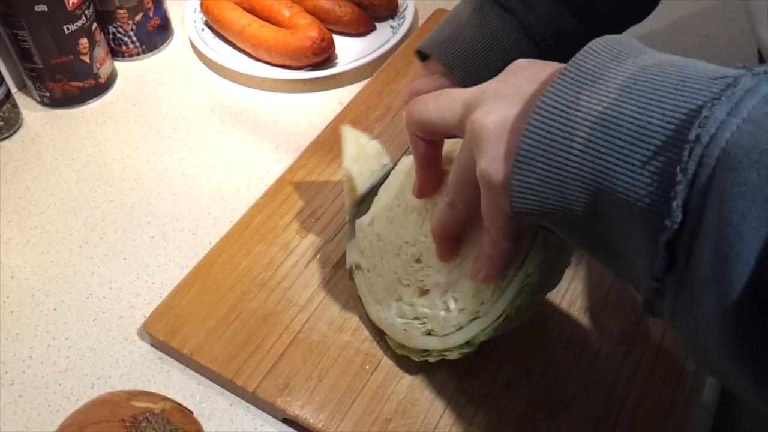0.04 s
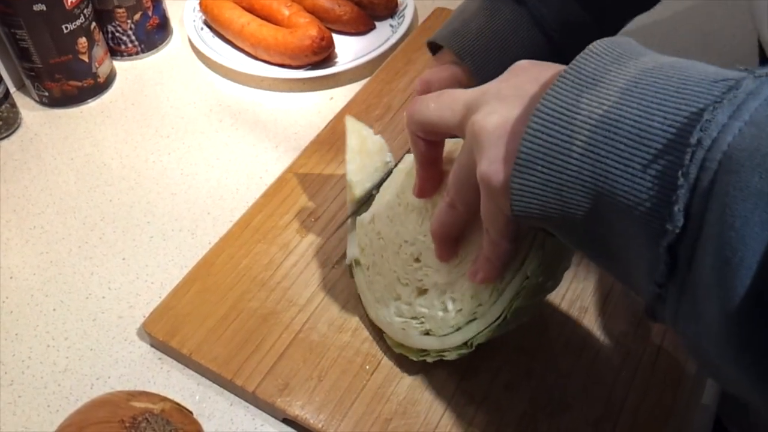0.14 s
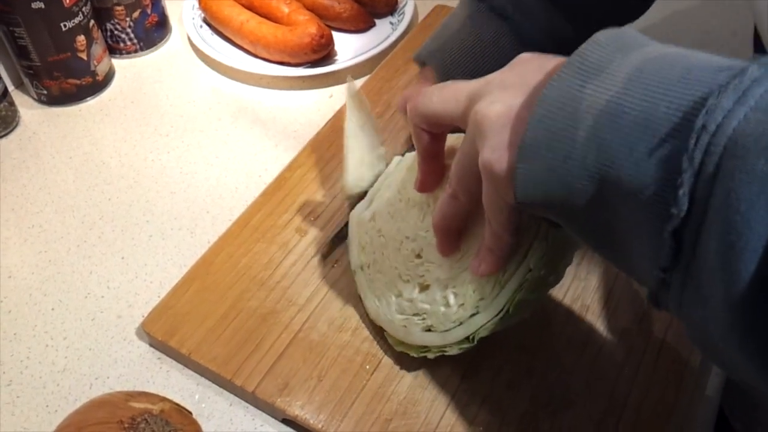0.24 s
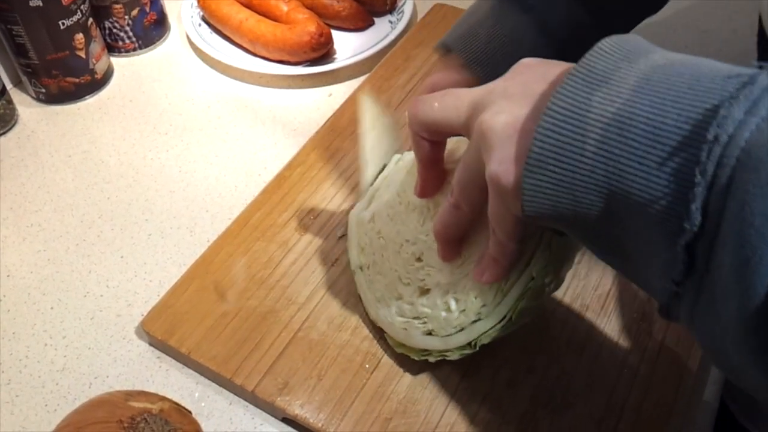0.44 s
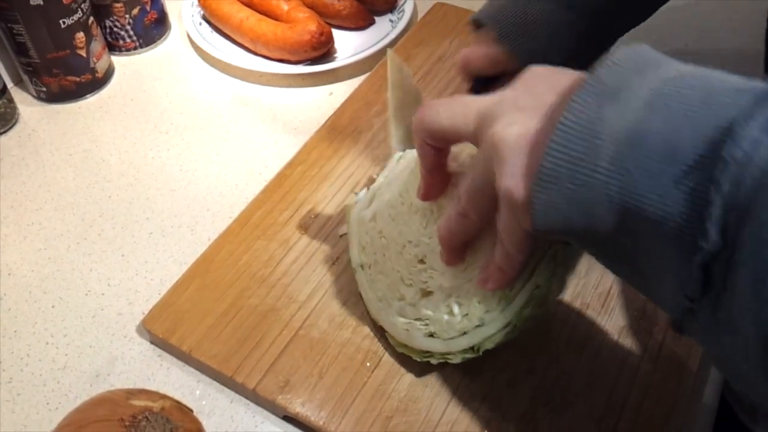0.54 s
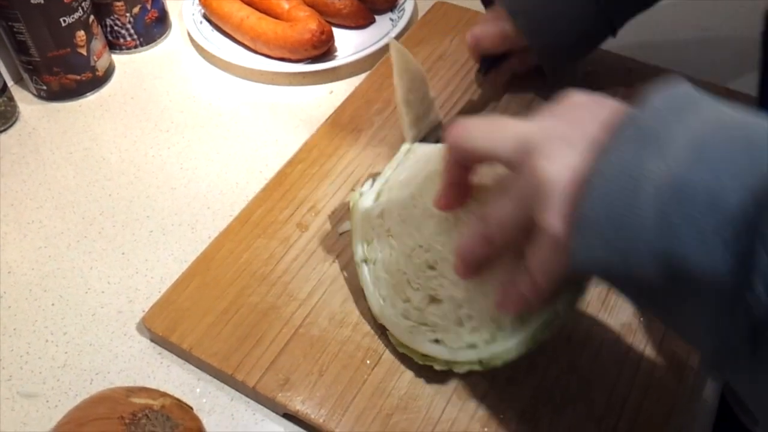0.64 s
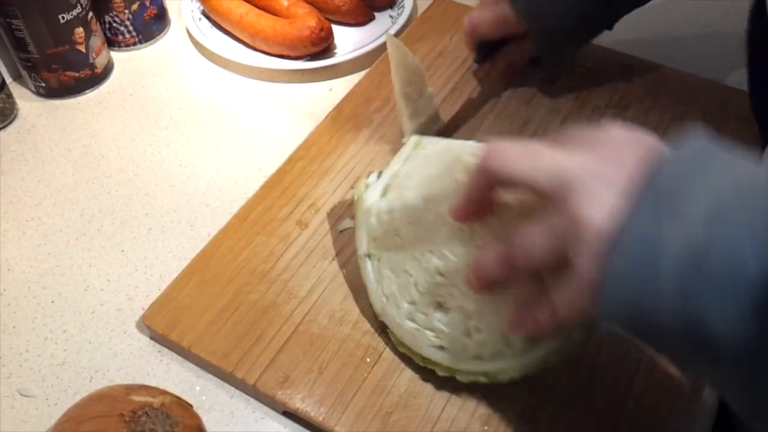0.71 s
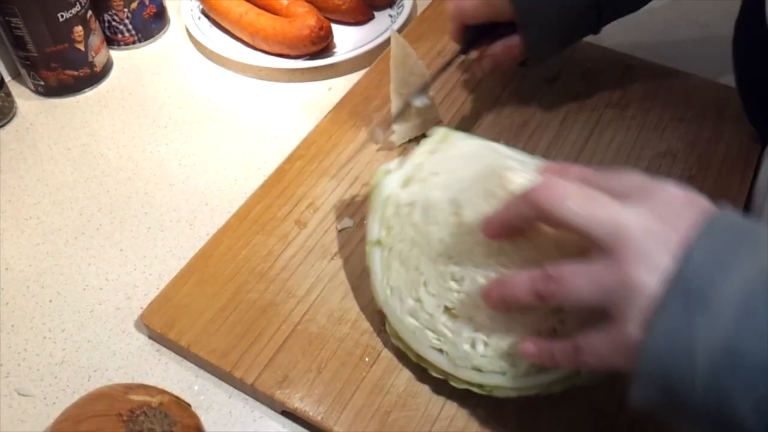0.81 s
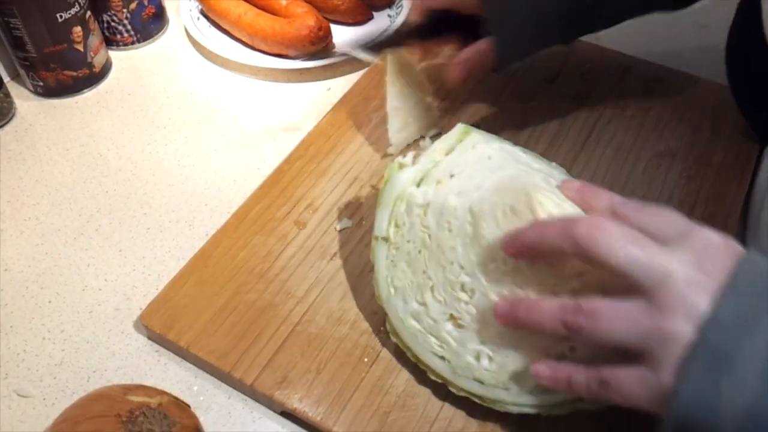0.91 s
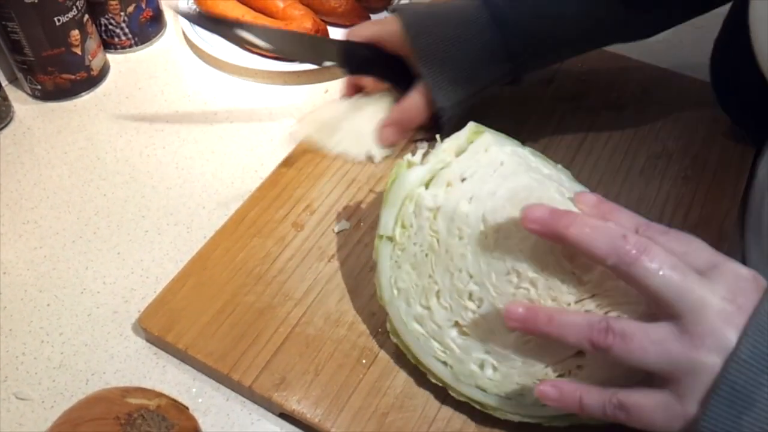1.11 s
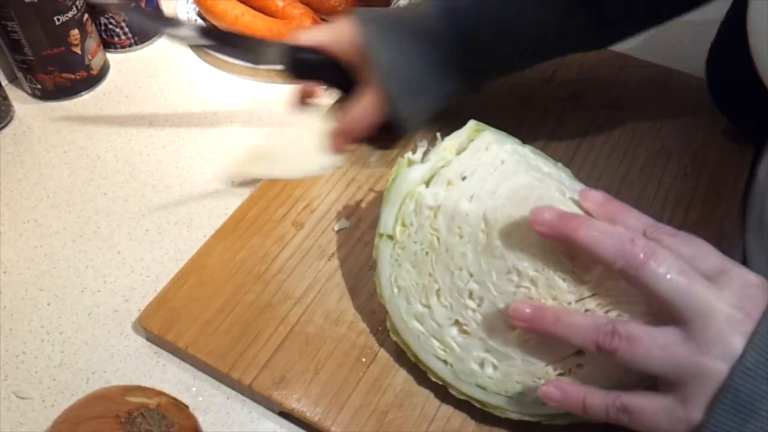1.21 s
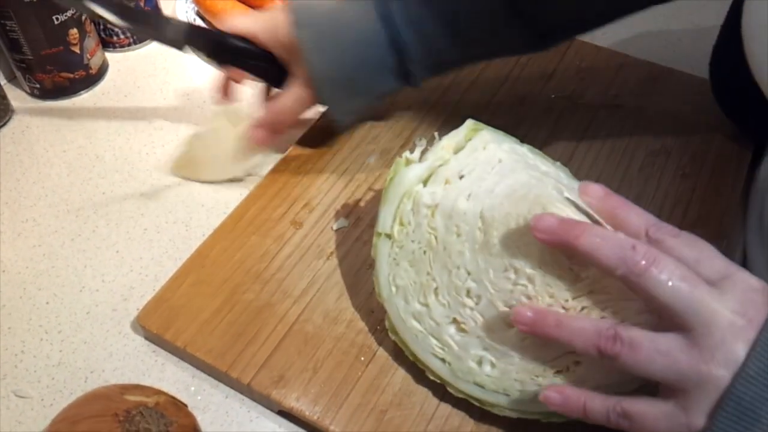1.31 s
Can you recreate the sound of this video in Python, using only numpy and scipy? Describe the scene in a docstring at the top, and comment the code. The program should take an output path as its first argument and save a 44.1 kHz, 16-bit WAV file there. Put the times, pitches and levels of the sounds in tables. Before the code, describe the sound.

A knife pushes through a raw cabbage core with a wet crackle and one sharp snap. Leaves tick and rustle, then the cut piece knocks softly on a wooden board, close by in a faintly humming kitchen.

```python
"""A kitchen knife is forced through a raw cabbage core on a wooden board, in a small, softly humming
kitchen. The blade rubs in the cut with a wet crackle and a leaf or two ticks. At 0.2 s a crack runs
through the core, its cells bursting ever harder, until the wedge snaps off and core, blade and board
ring. The blade slides out past the leaves, which tick and rustle. At 1.1 s the wedge topples onto
the board and rocks in a few soft knocks."""
import sys
import numpy as np
from scipy import signal
from scipy.fft import rfft, irfft, next_fast_len
from scipy.io import wavfile
from scipy.ndimage import uniform_filter1d

SR = 44100
rng = np.random.default_rng(int(sys.argv[2]) if len(sys.argv) > 2 else 0)


def to_wav(s):
    """Save 16-bit WAV."""
    ch = np.atleast_2d(s).T  # columns
    pcm = np.round(np.clip(ch, -1, 1) * 32767)  # PCM
    wavfile.write(sys.argv[1], SR, pcm.astype(np.int16))


N = 59535
T = np.arange(N) / SR
FFT_SIZE = 2 * next_fast_len(N * 3 // 4)
HZ = np.maximum(np.arange(FFT_SIZE // 2 + 1) * SR / FFT_SIZE, 1)


def from_db(db):
    """Decibels to gain."""
    return 10 ** (np.asarray(db) / 20)


def at_hz(points):
    """Draw a curve through (Hz, value) points on a log-frequency axis."""
    hz, value = np.transpose(points)
    return np.interp(np.log(HZ), np.log(hz), value)


def filtered(x, response):
    """Apply a frequency response."""
    return irfft(rfft(x, FFT_SIZE) * response, FFT_SIZE)[..., :N]


def colour(x, points):
    """Minimum-phase EQ through (Hz, dB) points; white noise keeps its power."""
    gain = from_db(at_hz(points))
    cepstrum = irfft(np.log(gain / np.sqrt(np.mean(gain ** 2))))
    cepstrum[1:FFT_SIZE // 2] *= 2
    return filtered(x, np.exp(rfft(cepstrum[:FFT_SIZE // 2], FFT_SIZE)))


def decay(start, t60):
    """Envelope that jumps to 1 and falls 60 dB in t60 seconds."""
    return (T >= start) * from_db(-60 * np.clip((T - start) / t60, 0, 4))


def ring(force, modes):
    """Drive a set of damped resonances; none passes a steady push."""
    body = np.zeros(N)
    for hz, db, t60 in modes:
        omega = 2 * np.pi * hz
        damping = np.log(1000) / (omega * t60)
        body += from_db(db) * decay(0, t60) * (np.cos(omega * T) - damping * np.sin(omega * T))
    body[0] /= 2
    return filtered(force, rfft(body, FFT_SIZE))


def bursting_cells(per_s, spread_db):
    """Random clicks of uneven size, with power held near 1."""
    sizes = from_db(spread_db * np.minimum(rng.exponential(1, N), 5)) * rng.choice([-1, 1], N)
    clicks = sizes * (rng.random(N) < per_s / SR)
    power = np.abs(uniform_filter1d(clicks ** 2, size=500))
    return clicks / np.sqrt(power + 1e-9)


# Stereo width of reflected sound. Each row: frequency in Hz, left-right correlation.
STEREO_LIKENESS = [(50, 0.98), (200, 0.62), (600, 0.52), (1200, -0.13), (2200, -0.002), (6000, 0.14)]

def diffuse_noise():
    """White noise from all around, alike on both sides in the bass only."""
    alike = at_hz(STEREO_LIKENESS)
    mid, side = filtered(rng.standard_normal((2, N)), np.sqrt([(1 + alike) / 2, (1 - alike) / 2]))
    return np.array([mid + side, mid - side])


# The appliance's drone. Each row: pitch in Hz, rms level in dB.
HUM_TONES = [(181, -56), (238, -57.5), (640, -61.5)]

def appliance_hum(width_hz=6.6):
    """An appliance hums throughout; each tone wavers because it is a very narrow band of noise."""
    bands = np.array([1 / (1 + ((HZ - hz) / width_hz) ** 2) for hz, _ in HUM_TONES])
    tones = filtered(rng.standard_normal((len(HUM_TONES), N)), bands)
    return sum(from_db(db) * tone / tone.std() for (_, db), tone in zip(HUM_TONES, tones))


# The dark EQ of the room tone. Each row: frequency in Hz, relative level in dB.
ROOM_TONE_EQ = [(25, 1.5), (55, -14.5), (95, -13), (125, -3), (165, -0.5), (215, -12.5), (290, -6),
                (400, -13), (520, -16), (660, -9.5), (1000, -15), (2000, -24), (5000, -25), (14000, -29.5)]

def room_tone(level_db=-46.5):
    """A faint, steady bed of noise under everything."""
    return from_db(level_db) * colour(diffuse_noise(), ROOM_TONE_EQ)


# The fader ride of the rubbing. Each row: time in seconds, level in dB.
RUB_LEVELS = [(0, -27.5), (.018, -34), (.04, -41.5), (.10, -46.5), (.13, -42.5), (.16, -50.5), (.2, -62.5),
              (.34, -44.5), (.42, -43.5), (.45, -43), (.468, -37.5), (.5, -39.5), (.555, -36.5),
              (.585, -46), (.61, -42.5), (.66, -46.5), (.8, -55), (.93, -54), (1.05, -64), (1.2, -53),
              (1.3, -70)]
# Its broad, crisp EQ. Each row: frequency in Hz, relative level in dB.
RUB_EQ = [(100, -7.5), (300, 0), (800, -2.5), (1500, 0), (2500, 1.5), (3800, 2), (5200, -3), (7500, -0.5),
          (10500, -10.5), (14000, -22)]

def rubbing():
    """Fine crackle of wet leaves against the blade and each other."""
    level = from_db(np.interp(T, *np.transpose(RUB_LEVELS)))
    return colour(bursting_cells(per_s=2000, spread_db=5) * level, RUB_EQ)


# Single leaves cracking. Each row: start in seconds, level in dB, decay time in seconds,
# tilt (treble up, bass down) in dB, leaf pitch in Hz, ring level in dB.
LEAF_TICKS = [(.008, -16.5, 0.0012, -1.5, 3350, 5), (0.069, -10.5, 0.003, 9, 7450, -10),
              (0.206, -2, 0.0012, 10, 7400, -2), (0.22, -1.5, 0.00067, 2.5, 4270, 16),
              (.519, -22, 0.00087, -11.5, 3660, 0), (0.532, -17.5, 0.0023, -1.5, 3270, 13),
              (0.5492, -9.5, 0.0037, -4, 3340, -0.5), (0.571, -16, 0.0028, -3, 2800, 0),
              (0.69, -24, .002, -2, 3400, 4), (.718, -23, 0.0023, -2.5, 3800, 9),
              (0.758, -26.5, 0.0008, -5, 4200, 9), (0.7754, -24.5, 0.0015, -2, 2000, -1),
              (0.809, -20.5, 0.00079, 2, 7200, 1), (0.824, -22, 0.0023, -2, 4100, 7),
              (0.851, -17.5, 0.0051, 1, 8000, 4), (0.855, -16, 0.015, -0.5, 3800, 3),
              (.903, -18.5, 0.0013, -6.5, 3900, 16), (0.909, -19.5, 0.0056, -3.5, 3640, -5),
              (.923, -17.5, 0.0061, -1, 2210, -21), (0.942, -24, 0.0012, -1, 7500, -2),
              (0.9755, -27.5, 0.0022, 2, 3520, 5), (1.030, -27.5, .003, -6.5, 3500, -4),
              (1.1059, -20, 0.0034, -0.5, 2340, 12.5), (1.246, -24.5, 0.0057, 2, 6500, 13)]
# The thin, bright EQ they share. Each row: frequency in Hz, relative level in dB.
TICK_EQ = [(100, -21), (400, -10), (1000, -4.5), (2000, -0.5), (3800, 1), (5200, -1.5), (7500, 1.5),
           (10500, -8.5), (14000, -21)]

def leaf_ticks(leaf_q=8.9, tilt_pivot_hz=4000):
    """Each leaf crack is a short, dying run of bursting cells that rings at the pitch of its leaf."""
    ticks = np.zeros(N)
    for start, db, decay_s, tilt_db, hz, ring_db in LEAF_TICKS:
        fade = (T >= start) * np.exp(-np.minimum(np.abs(T - start) / decay_s, 50))
        run = bursting_cells(per_s=2600, spread_db=4) * fade
        run[int(start * SR)] += 6.2  # the first cell gives a hard attack
        run += from_db(ring_db) * signal.lfilter(*signal.iirpeak(hz, leaf_q, fs=SR), run + 1e-18)
        dull = signal.lfilter(*signal.butter(1, tilt_pivot_hz, fs=SR), run + 1e-18)
        tick = from_db(-tilt_db) * dull + from_db(tilt_db) * (run - dull)
        ticks += from_db(db) * tick / np.linalg.norm(tick)
    return colour(ticks, TICK_EQ)


CRACK_S, SNAP_S = 0.2048, 0.2324
# The biting EQ of the running crack. Each row: frequency in Hz, relative level in dB.
CRACK_EQ = [(50, -21), (110, -5), (300, -8), (900, -5), (1500, -4.5), (2000, 4), (3100, 1), (4300, -1),
            (5200, -2.5), (7200, 5), (10000, -2.5), (14000, -11)]

def core_crack(start_db=-19.5, end_db=-12.5, release_s=0.0055):
    """Cells burst ever harder as the split runs through the core."""
    progress = np.clip((T - CRACK_S) / (SNAP_S - CRACK_S), 0, 1)
    swell = from_db(start_db + (end_db - start_db) * progress ** 5.8)  # surges just before the snap
    gate = (T >= CRACK_S) * np.exp(-np.maximum(T - SNAP_S, 0) / release_s)
    return colour(bursting_cells(per_s=4100, spread_db=3.5) * swell * gate, CRACK_EQ)


# Core, blade and board ringing at the snap. Each row: pitch in Hz, level in dB, t60 in seconds.
SNAP_RING = [(128, -48, 0.31), (248.5, -45.5, 0.064), (319, -30.5, 0.13), (440, -28.5, 0.069),
             (524, -38.5, 0.2), (757, -24, 0.062), (1270, -16.5, .03), (1544, -21, 0.052),
             (1880, -12.5, 0.035), (1977, -16, .06), (2583, -10, 0.017), (2773, -12.5, 0.036),
             (3690, 1.5, 0.0052), (4100, -24, 0.007)]
# The midrange crunch of the last fibres. Each row: frequency in Hz, relative level in dB.
FIBRE_EQ = [(60, -41), (130, -10), (300, 3), (900, -3.5), (1600, 3.5), (2700, -1), (3400, -15), (6000, -16),
            (14000, -34)]

def wedge_snap(soften_hz=5850, fibres_db=-26.5, fall_db_per_s=194):
    """The wedge breaks free in one blow, and the last fibres tear after it."""
    impulse = np.zeros(N)
    impulse[int(SNAP_S * SR)] = 1
    blow = filtered(impulse, 1 / (1 + 1j * HZ / soften_hz))
    tearing = (T >= SNAP_S) * from_db(fibres_db - fall_db_per_s * np.abs(T - SNAP_S))
    fibres = colour(bursting_cells(per_s=1800, spread_db=3.5) * tearing, FIBRE_EQ)
    return ring(blow, SNAP_RING) + fibres


# The wedge lands and rocks. Each row: start in seconds, level in dB, contact time in seconds.
WEDGE_KNOCKS = [(1.1065, -9, 0.00046), (1.1083, 0.5, .0012), (1.1152, 3, 0.0013), (1.1405, -4.5, .001),
                (1.147, -3.5, 0.0013), (1.189, -14.5, 0.00068)]
# The board's woody ring. Each row: pitch in Hz, level in dB, t60 in seconds.
BOARD_RING = [(188, -50, 0.17), (283.5, -39, 0.19), (334, -39, 0.12), (430, -36, 0.043),
              (499, -41.5, 0.038), (518, -44.5, 0.14), (603, -39.5, 0.054), (733, -43.5, 0.096),
              (810, -46, 0.088), (990, -45, 0.075), (1390, -33, 0.032), (2490, -28, 0.039)]

def wedge_landing():
    """Soft pushes of the falling wedge set the board ringing; longer contact sounds duller."""
    force = np.zeros(N)
    for start, db, contact_s in WEDGE_KNOCKS:
        push = np.sin(np.pi * np.clip((T - start) / contact_s, 0, 1)) ** 2
        force += from_db(db) * push / (push.sum() + 1e-9)
    return ring(force, BOARD_RING)


# The top treble leans to the right. Each row: frequency in Hz, left minus right in dB.
PAN_CURVE = [(300, 0.5), (1200, -0.5), (5400, 0), (8500, -7), (14000, -10.5)]

def kitchen(x, direct_db, near_db=0.5, tail_db=-8.7, split_hz=3100, left_lag_s=0.00007):
    """Direct sound, quick echoes off board and counter, and a room tail whose treble dies first."""
    near = diffuse_noise() * decay(0.00062, t60=0.051)
    near *= from_db(near_db) / np.linalg.norm(near, axis=1, keepdims=True)
    noise = diffuse_noise()
    low = filtered(noise, 1 / (1 + (HZ / split_hz) ** 4))
    tail = low * decay(0.0082, t60=0.33) + (noise - low) * decay(0.0082, t60=0.24)
    tail *= from_db(tail_db) / np.linalg.norm(tail, axis=1, keepdims=True)
    direct = from_db(direct_db) * np.exp(-2j * np.pi * HZ * np.array([[left_lag_s], [0]]))
    pan = from_db(at_hz(PAN_CURVE) * np.array([[0.5], [-0.5]]))
    return filtered(x, (direct + rfft(near + tail, FFT_SIZE)) * pan)


def along_blade(source, direct_db, spots=2):
    """The source sounds from separate spots on the blade, each with echoes of its own."""
    return sum(kitchen(source(), direct_db) for _ in range(spots)) / np.sqrt(spots)


def scene():
    """All the cutting sounds in the kitchen, over its hum and room tone."""
    rub = along_blade(rubbing, direct_db=-2.5)
    crack = along_blade(core_crack, direct_db=-1.5)
    snap = kitchen(wedge_snap(), direct_db=3.5)
    ticks = kitchen(leaf_ticks(), direct_db=3)
    landing = kitchen(wedge_landing(), direct_db=4.5)
    return appliance_hum() + room_tone() + rub + ticks + crack + snap + landing


def record(dry):
    """Peaks clip at full scale; the bass is thinned and the top is cut steeply."""
    low_cut = signal.butter(2, 105, "high", fs=SR, output="sos")
    high_cut = signal.ellip(10, 0.3, 70, 14450, fs=SR, output="sos")
    clipped = np.clip(dry, -1, 1)
    return signal.sosfilt(high_cut, signal.sosfilt(low_cut, clipped))


dry = scene()
out = record(dry)
to_wav(out)
```